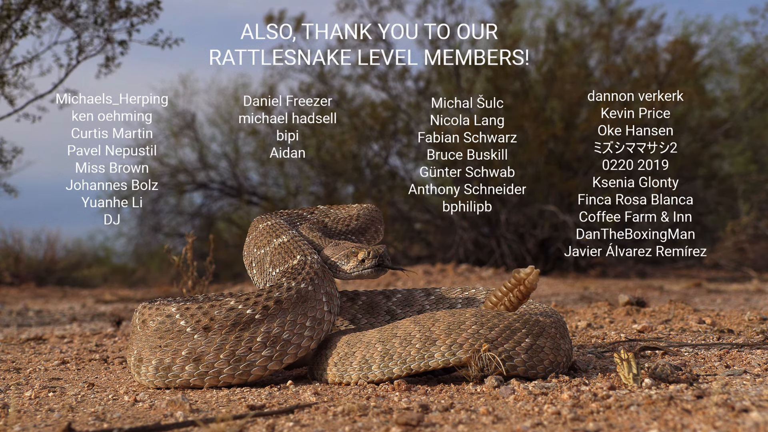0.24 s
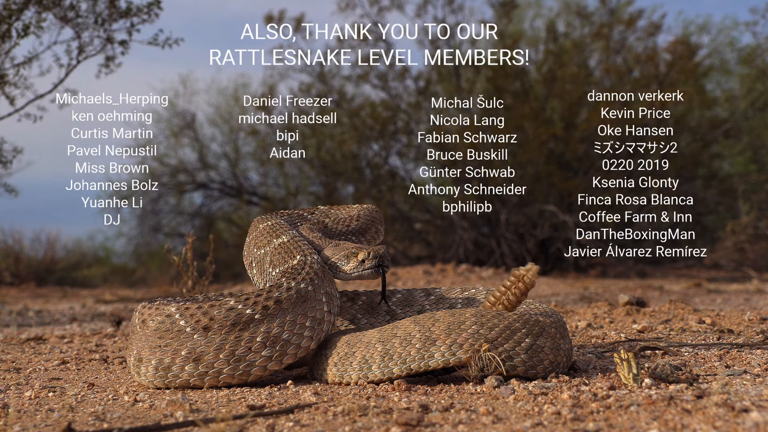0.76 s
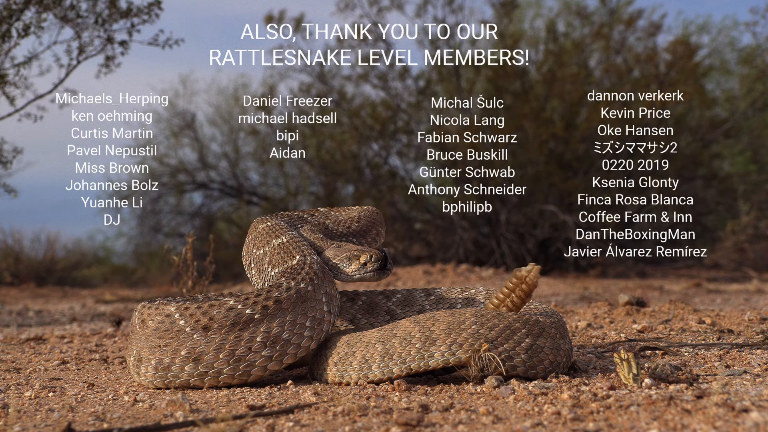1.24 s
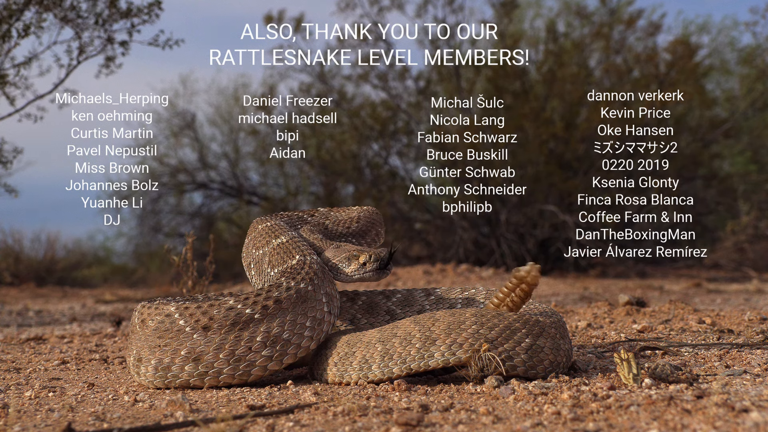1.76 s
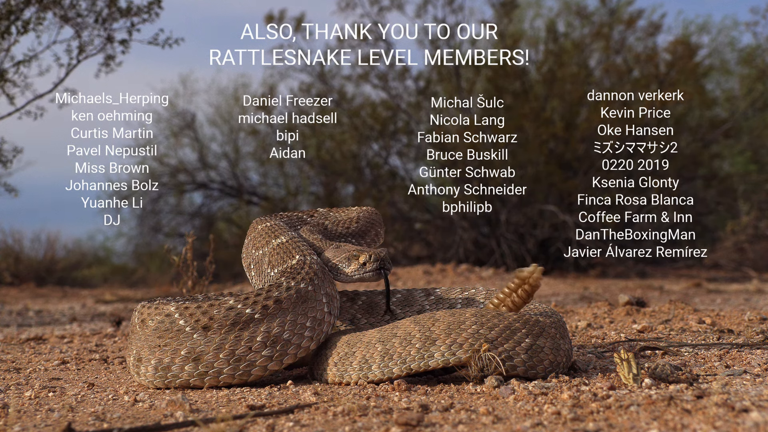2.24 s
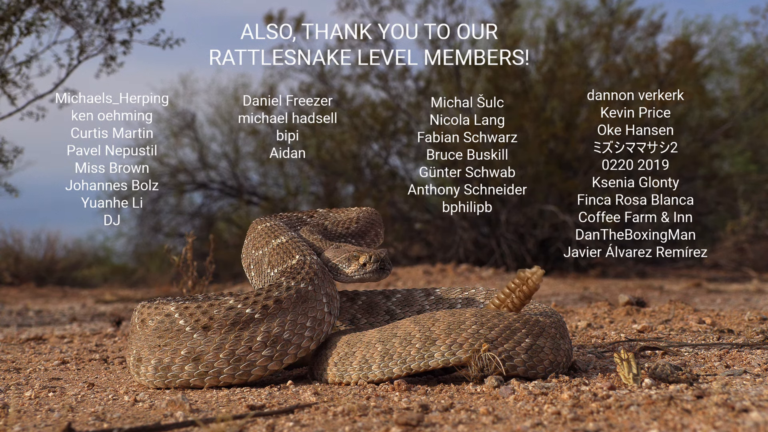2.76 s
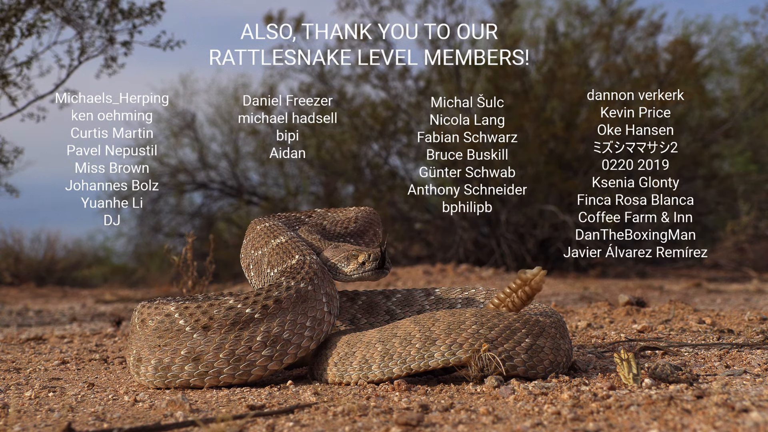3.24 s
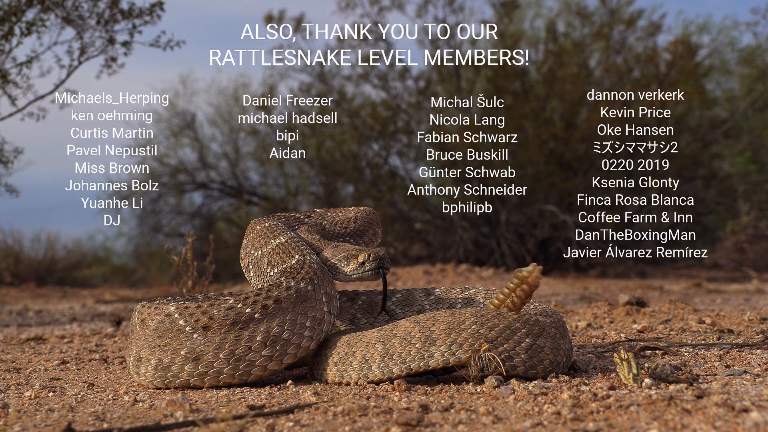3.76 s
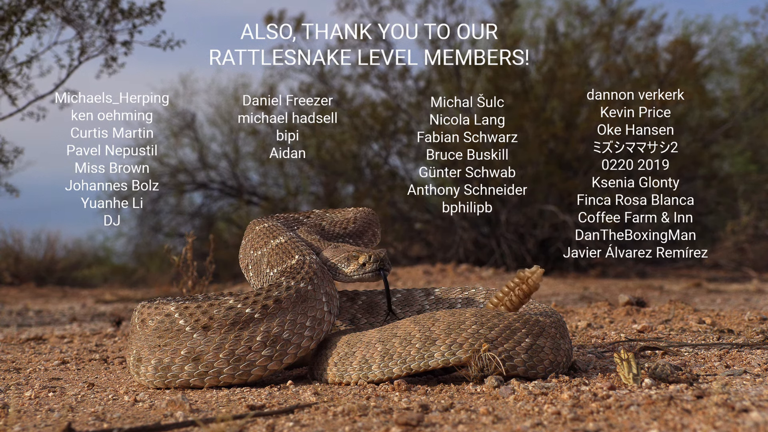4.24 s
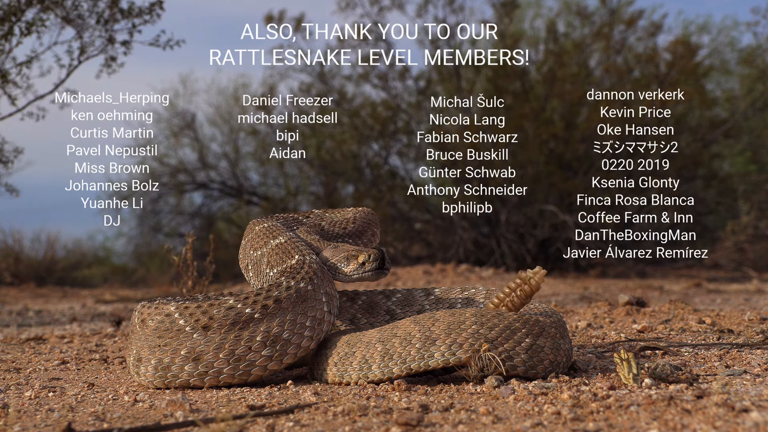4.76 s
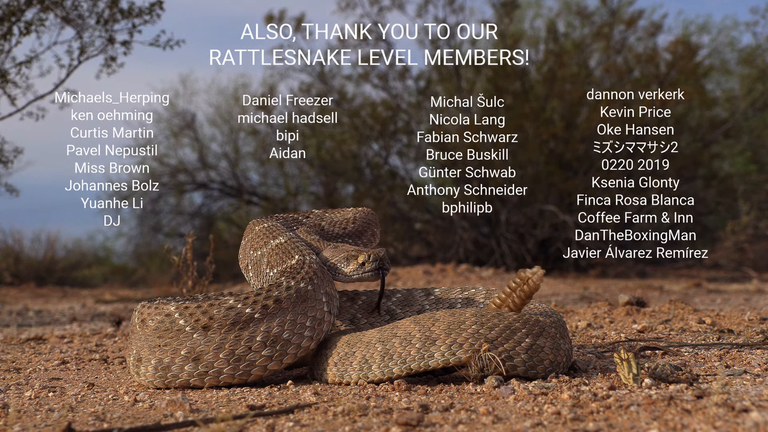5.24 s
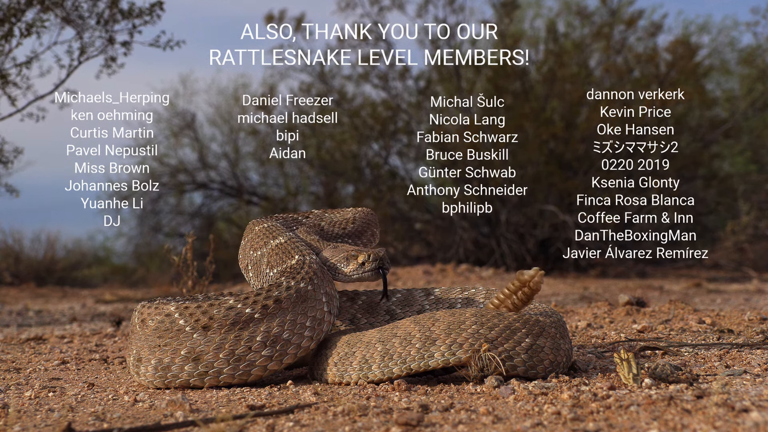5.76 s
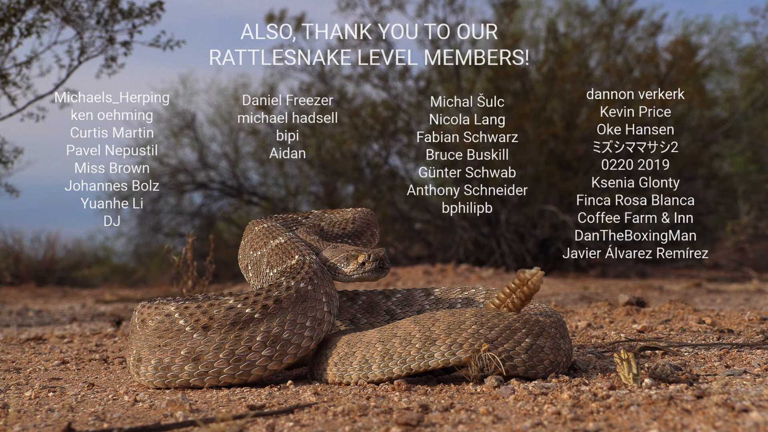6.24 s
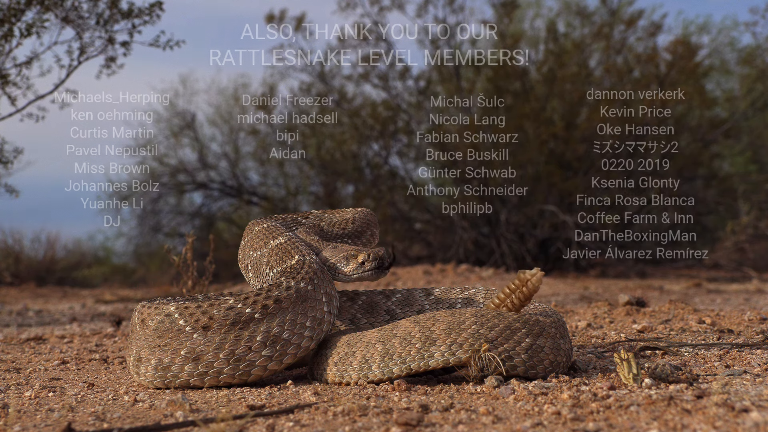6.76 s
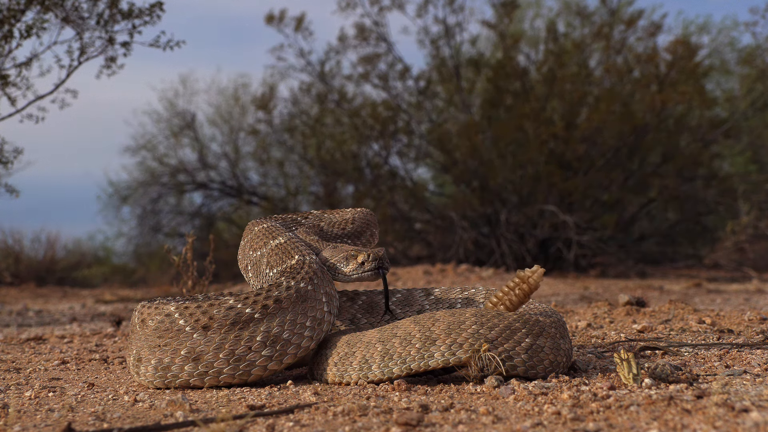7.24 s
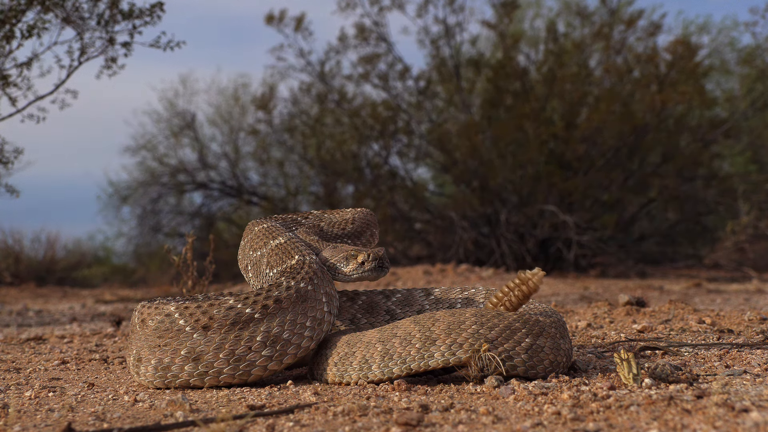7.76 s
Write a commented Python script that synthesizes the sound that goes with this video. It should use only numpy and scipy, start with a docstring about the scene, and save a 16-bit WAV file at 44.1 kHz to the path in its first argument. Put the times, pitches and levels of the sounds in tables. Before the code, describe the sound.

Outdoors, close and in mono, hollow horny segments clatter together. First come quick individual bursts of clicks, then the shaking swells into a hissing, seed-shaker-like rattle that continues without a pause, fluttering rapidly and varying slightly in strength and brightness. Sharp little knocks stand out at random. The background is very quiet low air rumble, gentle wind puffs, and a very faint engine hum in the second half.

```python
"""A coiled rattlesnake flicks its tail singly, surges hard, then shakes it mostly 22-26 times a second.
Impact and resonance: each swing throws hollow horn segments together in a burst of clicks that ring in them.
Shaped noise makes the open air throughout, a low rumble with puffs of wind on the microphone;
later a far engine fades in, a tone and its octave that slowly rise in pitch."""
import sys
import numpy as np
from scipy import signal
from scipy.io import wavfile
from scipy.ndimage import uniform_filter1d

SR = 44100
rng = np.random.default_rng(int(sys.argv[2]) if len(sys.argv) > 2 else 0)


def output_pcm(signal):
    """Save a mono or channel-first signal as 16-bit PCM at the path in sys.argv[1].

    Samples are clipped to [-1, 1] before scaling.
    """
    pcm = np.clip(np.atleast_2d(signal).T, -1, 1) * 32767
    wavfile.write(sys.argv[1], SR, np.round(pcm).astype(np.int16))


def gain_from_db(level_db):
    """Convert decibel levels to linear amplitude factors (20 dB per decade)."""
    decades = np.asarray(level_db, float) / 20
    return 10 ** decades


N = 353108   # length in samples

# Effort of the tail: burst of a swing, and loose segments chattering on between swings.
# Columns: time_s, burst_db, chatter_db
EFFORT = [(0.0, -28, -55), (0.15, -28, -73), (0.5, -28, -57), (0.75, -35, -61), (0.88, -27, -42),
          (0.98, -28, -25), (1.24, -29.5, -21.5), (1.5, -29.5, -27), (1.68, -26, -34.5), (2.1, -29, -39.5),
          (2.6, -27.5, -39.5), (2.8, -26, -34.5), (3.1, -28, -40.5), (3.75, -27.5, -41),
          (3.971, -26.5, -28), (4.15, -27.5, -28), (4.3, -26.5, -36), (4.6, -28.5, -37.5),
          (5.0, -29.5, -43), (5.5, -29.5, -46.5), (5.85, -31, -48.5), (6.1, -28, -30), (6.3, -28.5, -31.5),
          (6.55, -28, -41), (6.82, -29, -33), (7.2, -29.5, -43), (8.0, -30.5, -44)]

FAVOUR_DB = 3.5   # greatest boost of the modes near a contact's favoured pitch


def rms_one(x):
    """Normalization: divide by the root mean square."""
    return x / np.sqrt(np.mean(x ** 2) + 1e-20)


def in_time(rows):
    """Linear interpolation: each column of a curve against time, one value per sample."""
    time_s, *columns = np.transpose(rows)
    return [np.interp(np.arange(N) / SR, time_s, column) for column in columns]


def drift(rate_hz):
    """Low-passed noise: slow random wavering of unit rms, from two equal poles at rate_hz."""
    step = 40   # samples between the drawn values
    r = np.exp(-2 * np.pi * rate_hz * step / SR)
    noise = rng.standard_normal(N // step + 2002)
    slow = signal.lfilter([1], [1, -2 * r, r * r], noise)[2000:]   # the onset is left out
    return np.interp(np.arange(N) / step, np.arange(len(slow)), rms_one(slow))


def resonance(hz, width_hz):
    """Damped resonance: a two-pole band-pass whose gain is 1 at the peak."""
    r = np.exp(-np.pi * width_hz / SR)
    b = (1 - r * r) / 2 * np.array([1, 0, -1])
    return b, [1, -2 * r * np.cos(2 * np.pi * hz / SR), r * r]


def band_pass(x, low_hz, high_hz):
    """Band limiting: a Butterworth band-pass."""
    return signal.sosfilt(signal.butter(2, [low_hz, high_hz], "band", fs=SR, output="sos"), x)


def rattle():
    """Random impacts: contacts as dense and strong as the shaking demands, plus the hardest knocks."""
    # hardest single knocks of segment on segment, nominal peaks; columns: start_s, peak_db
    knocks = [(0.349, -26), (0.4094, -18), (0.4605, -25), (0.5186, -30), (0.581, -29), (0.7356, -21),
              (0.791, -22), (0.8329, -25), (0.8713, -21), (1.791, -13), (1.8675, -17), (2.106, -13),
              (2.1782, -20), (2.293, -19), (2.4532, -20), (2.6553, -12), (3.1325, -13), (3.3746, -21),
              (3.416, -16), (3.6226, -24), (3.6603, -12), (3.7864, -26), (4.4197, -11), (4.4627, -14),
              (4.5017, -9), (4.5435, -21), (4.753, -26), (4.8737, -18), (4.9158, -26), (4.999, -29),
              (5.0387, -18), (5.0872, -16), (5.1216, -15.5), (5.2528, -23), (5.383, -17), (5.7452, -18),
              (5.9443, -14), (6.6796, -20), (6.716, -13), (7.177, -17), (7.2632, -21), (7.3072, -23),
              (7.3471, -18), (7.866, -25), (7.909, -23)]
    # the tail turns, so more or less treble reaches the microphone; columns: time_s, treble_db
    turn = [(0, 1.5), (1.2, -0.7), (3, 1), (4, -0.2), (5, 1.4), (6, 0.5), (8, 2)]
    clicks_per_s, rate_exponent = 3200, 0.41   # rate at -30 dB; its growth as a power of amplitude
    click_spread_db, mode_spread_db = 2.5, 2.5
    favoured_mean_hz, favoured_spread_hz = 3420, 140
    light_treble_per_db = 0.4   # light contacts are thinner, so brighter: dB per dB under the average
    ring_peak_db = -11   # peak of the ring left by a click of unit energy
    knock_treble_db, knock_spread_db = -2, 5

    power = shaking()
    relative_amplitude = np.sqrt(1000 * power)   # 1 at -30 dB
    chance = np.clip(clicks_per_s / SR * relative_amplitude ** rate_exponent, 0, .5)
    sizes = rms_one(gain_from_db(click_spread_db * np.minimum(rng.exponential(1, N), 3)))
    contacts = rng.random(N) < chance
    clicks = gain_from_db(-3.5) * sizes * contacts * np.sqrt(power / chance)
    favoured_hz = favoured_mean_hz + favoured_spread_hz * rng.standard_normal(N)

    start_s, peak_db = np.transpose(knocks)
    at = np.round(start_s * SR).astype(int)
    clicks[at] = gain_from_db(peak_db - ring_peak_db - FAVOUR_DB)

    average = uniform_filter1d(power, size=SR // 8)
    treble_db = in_time(turn)[0] + light_treble_per_db * 10 * np.log10(average / power)
    treble_db[at] += knock_treble_db
    spread_db = np.full(N, mode_spread_db)
    spread_db[at] = knock_spread_db
    return horn(clicks, favoured_hz, treble_db, spread_db)


def shaking():
    """Addition of power: each swing's burst rises fast, holds and decays over the loose chatter."""
    # single flicks of the tail before the buzz; columns: start_s, burst_db, length_ms
    flicks = [(0.0, -36.5, 1.8), (0.063, -40, 17.4), (0.138, -40.5, 26), (0.211, -38, 16), (0.275, -36, 21),
              (0.34, -38, 24), (0.403, -31, 2.1), (0.455, -30, 6.4), (0.515, -31.5, 7.3), (0.576, -35, 13),
              (0.631, -37.5, 18), (0.731, -32.5, 7.7), (0.783, -28.5, 10.8)]
    rise_ms, fall_ms = 2.24, 7.45
    _, chatter_db = in_time(EFFORT)
    power = gain_from_db(2 * chatter_db)   # doubled dB turn amplitude into power
    t_ms = np.arange(SR // 8) / SR * 1000
    for start_s, level_db, hold_ms in [*flicks, *swings()]:
        burst = (1 - np.exp(-t_ms / rise_ms)) * np.exp(-np.clip(t_ms - hold_ms, 0, None) / fall_ms)
        at = round(start_s * SR)
        power[at:at + len(burst)] += (gain_from_db(level_db) * burst[:N - at]) ** 2
    return power


def swings():
    """Periodic motion: a swing starts near each whole count; rows of start_s, burst_db, length_ms."""
    # continuous shaking, mostly 22-26 swings a second, between about 18 and 27 at moments
    # columns: time_s, swings_so_far
    tail = [(0.79, 0.2), (0.9, 2.68), (1.1, 8.08), (1.3, 12.54), (1.4, 14.4), (1.75, 23.13), (2.25, 35.91),
            (2.85, 50.92), (3.15, 58.52), (3.5, 67.15), (3.8, 74.36), (4.5, 92.07), (4.75, 98.02),
            (5.15, 107.67), (5.4, 113.46), (5.75, 121.32), (5.9, 124.86), (6.1, 129.85), (6.2, 131.94),
            (6.3, 134.1), (7.05, 151.99), (7.55, 163.81), (7.97, 173.38)]
    burst_ms, burst_spread_ms, burst_spread_db = 20.37, 3.4, 1   # no two swings are alike
    short_is_loud_db_per_ms, jitter_ms, lead_ms = 0.28, 1.5, 2.1
    time_s, so_far = np.transpose(tail)
    counts = np.arange(np.ceil(so_far[0]), so_far[-1])
    start_s = np.interp(counts, so_far, time_s)
    jitter, longer, louder = rng.standard_normal((len(start_s), 3)).clip(-2, 2).T
    extra_ms = burst_spread_ms * longer
    effort_s, burst_db, _ = np.transpose(EFFORT)
    level_db = np.interp(start_s, effort_s, burst_db) + burst_spread_db * louder
    level_db = level_db - short_is_loud_db_per_ms * extra_ms
    start_s = start_s + (jitter_ms * jitter - lead_ms) / 1000
    return list(zip(start_s, level_db, burst_ms + extra_ms))


def horn(clicks, favoured_hz, treble_db, spread_db):
    """Modal resonance: a contact scrapes one segment and drives its modes with strengths of its own."""
    # modes of a horn segment, relative levels; columns: mode_hz, width_hz, level_db
    modes = [(1143, 480, -22.5), (1505, 950, -23), (2057, 480, -15), (2620, 730, -13), (3036, 355, -3.5),
             (3446, 700, -0.5), (3950, 730, -7.5), (4806, 1300, -8.5), (5503, 650, -8.5), (6480, 480, -12),
             (8330, 1600, -18.5), (9540, 650, -20), (10700, 3500, -20.5), (12520, 790, -27.5),
             (14100, 920, -26), (14600, 990, -30), (15500, 1200, -30)]
    # pitch of each segment against the modes; one column: pitch_ratio
    segment_pitches = [0.96, 0.95, 1.009]
    scrape_ms, scrape_growth = 0.95, 0.99   # decay at 8 kHz and above; power of pitch below
    favour_width_hz, swing_colour_db = 1210, 1.06

    at, out, energy = np.flatnonzero(clicks), np.zeros(N), 0
    segment = rng.integers(0, len(segment_pitches), N)[at]
    for hz, width_hz, level_db in modes:
        energy += gain_from_db(2 * level_db) * np.pi / 2 * width_hz / SR
        decay_ms = scrape_ms * min(hz / 8000, 1) ** scrape_growth
        fade = np.exp(-2000 / (decay_ms * SR))   # of power, hence twice as fast
        chance_db = spread_db * rng.standard_normal(N) + swing_colour_db * drift(12.5)
        favour_db = FAVOUR_DB * np.exp(-((hz - favoured_hz[at]) / favour_width_hz) ** 2)
        strength = gain_from_db(level_db + chance_db[at] + favour_db + treble_db[at] * (hz > 7000))
        roughness = rng.choice([-1, 1], N)
        for k, pitch_ratio in enumerate(segment_pitches):
            struck = np.full(N, 1e-30)
            struck[at] += (clicks[at] * strength * (segment == k)) ** 2
            scrape_power = signal.lfilter([(1 - fade) ** 2], [1, -2 * fade, fade ** 2], struck)
            # shifted by whole seconds, the same roughness serves each segment
            scrape = np.roll(roughness, k * SR) * np.sqrt(scrape_power)
            # shell and enclosed air are tuned alike: the ring swells briefly and its skirts are steep
            b, a = resonance(hz * pitch_ratio, width_hz)
            out += signal.sosfilt([[*b, *a]] * 2, scrape)
    return out / np.sqrt(energy)


def wind(level_db):
    """Turbulence noise: lumpy low noise on the microphone port."""
    noise = rms_one(band_pass(rng.standard_normal(N), 34, 90))
    return gain_from_db(level_db + 2.2 * drift(8.5)) * noise


def rumble(level_db, upper_db):
    """Spectral shaping: far traffic and air as half-octave noise bands, each flickering on its own."""
    # relative density of the noise; columns: pitch_hz, density_db
    spectrum = [(40, -39), (110, 0.5), (185, -2.5), (340, -10.5), (500, -18), (900, -19), (3600, -14),
                (7000, -35), (16000, -45)]
    out, edges_hz = 0, 30 * 2 ** np.arange(0, 9.6, .5)
    white = rng.standard_normal((2, N))   # neighbouring bands take different noise
    pitch_hz, density_db = np.transpose(spectrum)
    for k, (low, high) in enumerate(zip(edges_hz, edges_hz[1:])):
        band_db = np.interp(np.log(low * high) / 2, np.log(pitch_hz), density_db)
        band_db = band_db + 1.2 * drift(2.5) + upper_db * (low > 230)
        out = out + gain_from_db(band_db) * band_pass(white[k % 2], low, min(high, .45 * SR))
    return gain_from_db(level_db) * rms_one(out)


def drone():
    """Harmonic tone: an engine's firing tone and octave, wavering on the long way through the air."""
    # far engine, mean course of the firing tone; columns: time_s, pitch_hz, level_db
    engine = [(3.6, 124, -90), (4.16, 127.7, -67), (4.96, 134, -60), (5.28, 140, -58), (5.7, 143.7, -60.5),
              (6.36, 144, -60.5), (6.73, 144, -59.5), (6.99, 147, -62), (7.9, 146.5, -62)]
    octave_db = -16   # mean level against the firing tone
    pitch_hz, level_db = in_time(engine)
    phase = 2 * np.pi * np.cumsum(pitch_hz + 0.526 * drift(2.54)) / SR
    octave = gain_from_db(octave_db + 1.7 * drift(3.3)) * np.sin(2 * phase)
    return np.sqrt(2) * gain_from_db(level_db + 0.69 * drift(3.4)) * (np.sin(phase) + octave)


def scene():
    """Superposition: the rattle close by and the open air around it add up."""
    # open air, with the extra level of the rumble's upper bands (from about 240 Hz)
    # columns: time_s, wind_db, rumble_db, upper_db
    air = [(0.0, -75, -60, 2.5), (0.56, -77, -63, 4), (0.67, -69, -65, 4), (1.2, -68.5, -66.5, 2.5),
           (1.9, -73, -63, 0), (2.0, -80, -63.5, 2), (2.3, -68, -61, -3), (2.72, -70, -61.5, -1),
           (2.9, -78, -59.5, -3), (4.2, -84, -60.5, 0.5), (6.3, -84, -61, 1), (8.0, -76, -60, 0)]
    wind_db, rumble_db, upper_db = in_time(air)
    mix = rattle() + wind(wind_db) + rumble(rumble_db, upper_db) + drone()
    return mix[None]   # one channel


def band_limit(x):
    """A steep low-pass at the top of the band."""
    return signal.sosfilt(signal.butter(12, 16630, fs=SR, output="sos"), x)


def record(dry):
    """Band limiting: one microphone with a steep elliptic top cut at 15770 Hz."""
    top_cut = signal.ellip(12, .5, 40, 15770, fs=SR, output="sos")   # ripple and stop band in dB
    mix = signal.sosfilt(top_cut, dry)
    return band_limit(mix)


dry = scene()
out = record(dry)
output_pcm(out)
```